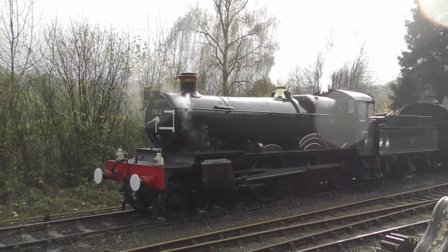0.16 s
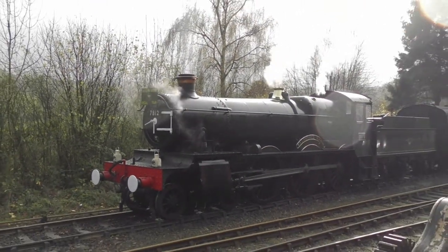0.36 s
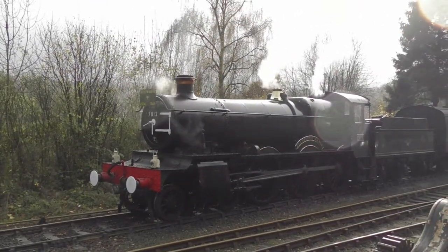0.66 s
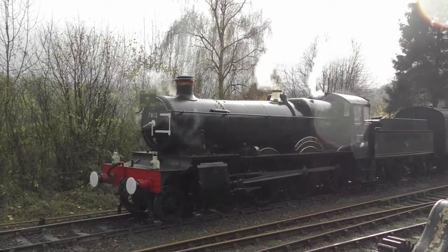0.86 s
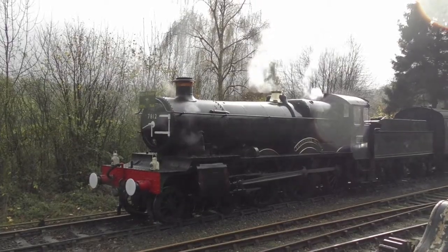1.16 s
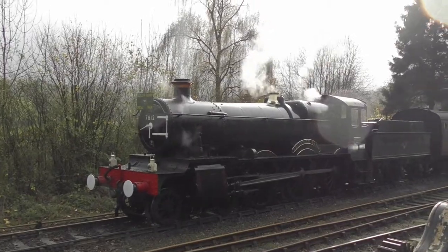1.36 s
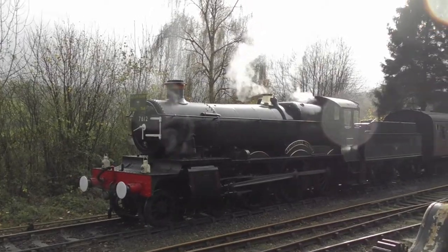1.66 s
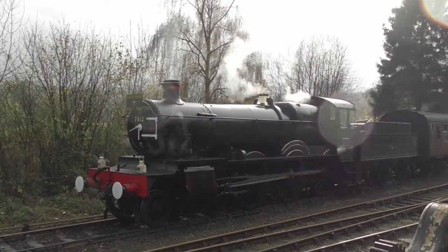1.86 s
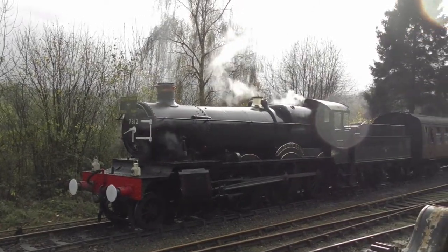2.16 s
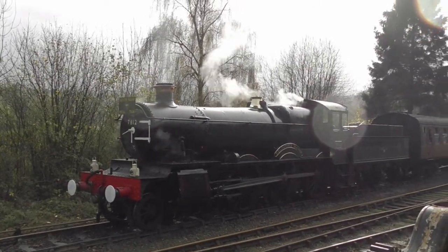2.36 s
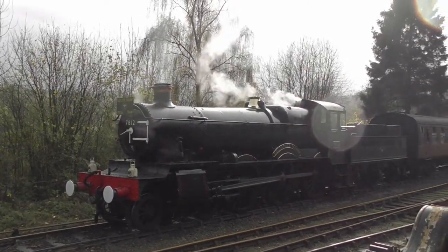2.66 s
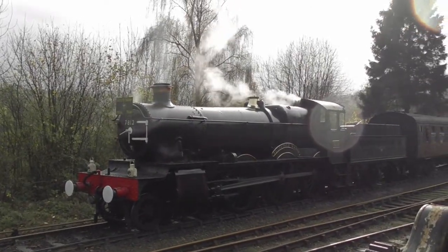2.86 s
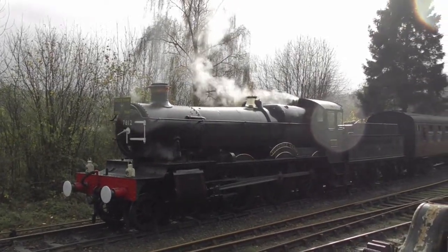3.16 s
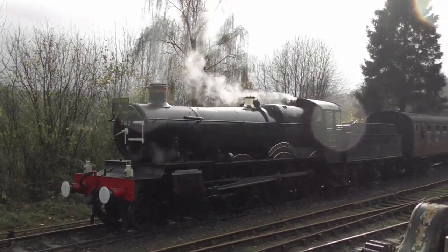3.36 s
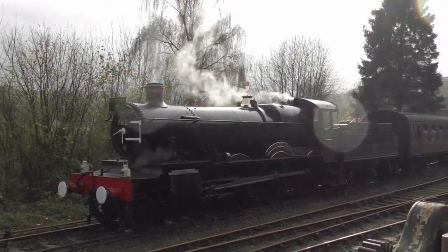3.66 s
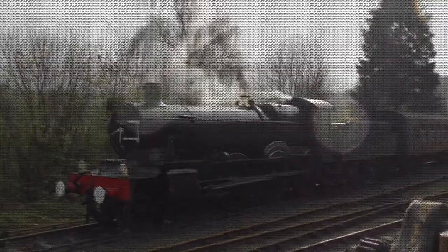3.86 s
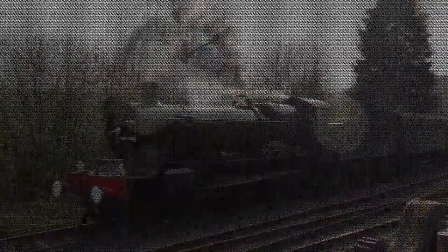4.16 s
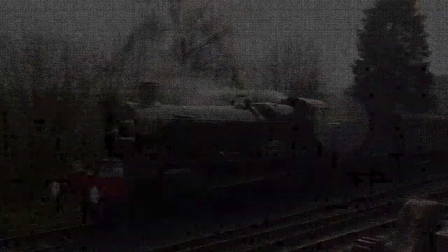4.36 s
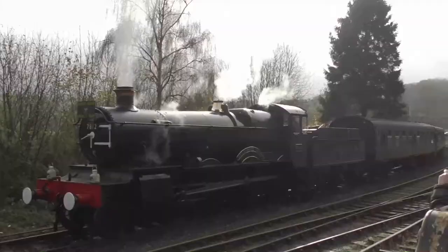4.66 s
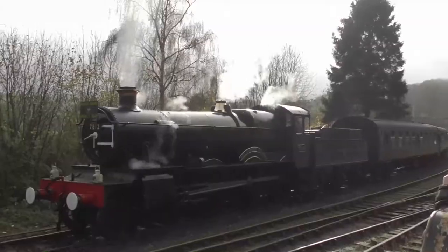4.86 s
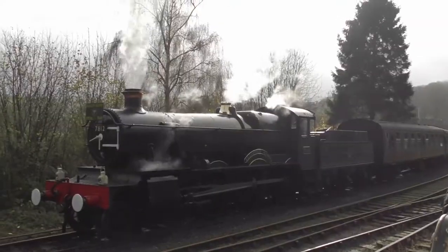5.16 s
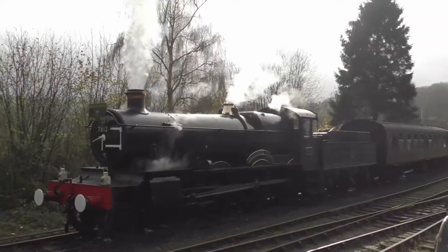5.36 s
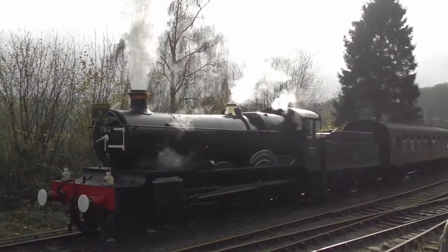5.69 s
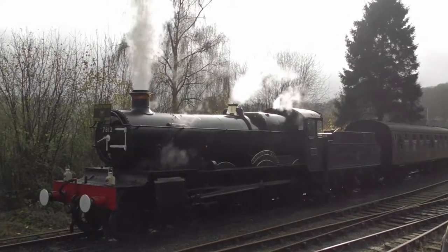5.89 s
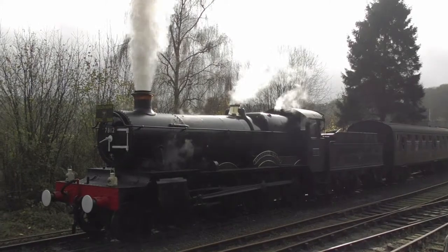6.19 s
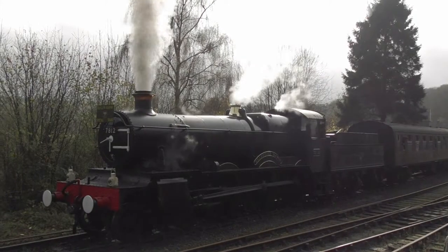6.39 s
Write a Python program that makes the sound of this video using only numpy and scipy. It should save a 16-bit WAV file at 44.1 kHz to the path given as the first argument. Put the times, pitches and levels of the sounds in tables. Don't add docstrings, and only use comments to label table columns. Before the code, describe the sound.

From 0 s a standing steam locomotive blows off outdoors: a loud, continuous, broadband hiss with a hollow roar from its pipes, strongest in the middle and upper range, slightly fluttering and wide in stereo. Between about 1.5 and 2 s its tone shifts subtly. Low wind flutter on the microphone is faint at first, with more thumps from about 2.4 s and stronger ones near 3.8 and 4.1 s. From 3.8 s everything fades steadily, nearly silent by 4.7 s. At 4.76 s the roar abruptly returns with altered resonances and slightly duller treble. A push of air and a short wet puff with a fuzzy rising whistle come at 4.8 s, the hiss ducking momentarily. A low hollow knock follows at 5.1 s. The heaviest wind gust hits around 5.75 s, briefly pressing the hiss down again; steam and lighter buffeting continue until 6.5 s.

```python
import sys
import numpy as np
from scipy import signal
from scipy.fft import rfft, irfft
from scipy.io import wavfile
from scipy.ndimage import uniform_filter1d

SR = 44100
rng = np.random.default_rng(int(sys.argv[2]) if len(sys.argv) > 2 else 0)


def waveform_to_disk(signal):
    frames = np.transpose(np.atleast_2d(signal))
    scaled = np.clip(frames, -1, 1) * 32767
    samples = np.round(scaled).astype(np.int16)
    wavfile.write(sys.argv[1], SR, samples)


def decibels_to_gain(level_db):
    exponent = np.asarray(level_db, float) / 20
    return 10 ** exponent


N = 287973
CUT_S = 4.7565

# [f/Hz, lead/rad]
PORT_LEAD = [(150, .15), (400, .12), (1000, .2), (1950, .3), (2240, .95), (3010, .6), (3880, 1.2),
             (4740, .9), (5510, 1.7), (6290, 1.55), (7920, 2.6), (9000, 3.1), (10600, 3.4)]


def evened(x):
    return x / np.sqrt(np.mean(np.mean(np.atleast_2d(x), 0) ** 2) + 1e-20)


def read(points, hz):
    f, value = np.transpose(points)
    return np.interp(np.log(hz + 1), np.log(f + 1), value)


def drift(low_hz, high_hz, t):
    rates_hz = np.geomspace(low_hz, high_hz, num=30)
    waves = sum(np.sin(2 * np.pi * (f * t + rng.random())) / np.sqrt(f) for f in rates_hz)
    return waves / waves.std()


def stages(t, start, attack, hold, release):
    return np.interp(t, start + np.cumsum([0, attack, hold, release]), [0, 1, 1, 0])


def noise(shared, apart, hz, lead_rad):
    z = rng.standard_normal((3, shared.shape[1], len(hz), 2)) @ [1, 1j]
    common, left, right = z.transpose(0, 2, 1)
    turn = np.exp(.5j * lead_rad)[:, None]
    pair = np.array([shared * common * turn + apart * left,
                     shared * common / turn + apart * right])
    size = 2 * len(hz) - 2
    return signal.istft(pair, nperseg=size, noverlap=3 * size // 4)[1][:, :N]


def jet(patchy_db=1.0, ripple_db=.6, dulling_db_per_octave=-.5, flutter_db=.45):
    # [f/Hz, half width/Hz, first level/dB,
    # level after plume shift/dB, level after cut/dB]
    pipes = [(197, 23, -1.5, -1, 3), (393, 47, -7.5, -6.5, -12), (588, 105, -11, -11.0, -11.5),
             (748.5, 21, 0, -1.5, -5), (835, 79, -3, -3.0, -1), (1034, 47, -13, -12.5, -8),
             (1205, 20.7, -0.5, -1, -6), (1298, 35, 2, 4.5, 5.5), (1428, 74, -0.5, -1, -1),
             (1704, 66, -3.5, -6.5, -10.5), (1804, 42, -9.0, -17, 0), (1873, 146, -3, -2.5, -7),
              (2245, 82, -1.5, -11, -4.5), (2380, 110, -11, -12.5, -12), (2676, 30, -11.5, -17, -6.5),
              (2770, 130, -9, -10, -10), (3130, 68, -9, -2.5, -3.5),
             (3566, 173, -4.5, -6, -51), (3630, 88, -51, -50, -5), (3995, 75, -6.5, -7, -3),
              (4320, 180, -5, -51, -11), (4465, 210, -53, -9.0, -12), (4850, 70, -2, -10, -7),
              (5220, 115, -16, -5, -9.5), (5720, 120, -8.5, -4, -8), (6100, 99, -15.5, -50, -11),
              (6130, 260, -9.5, -10, -22), (6780, 370, -18.5, -17, -14.5), (7700, 260, -22, -14, -47),
              (7780, 110, -49, -48, -13), (8250, 130, -15, -16, -21)]
    # [f/Hz, density/dB per Hz]
    open_jet = [(150, -36), (300, -13), (1000, -40), (2000, -28), (3500, -20.5), (5000, -12.5), (6500, -26),
                (8000, -20), (9200, -21), (10600, -21.5)]
    # [f/Hz, density/dB per Hz]
    scattered = [(130, -32), (220, -21), (400, -24), (800, -21), (1500, -26), (2200, -20), (3500, -19),
                 (5000, -17.5), (6500, -20), (8000, -22), (9200, -23), (10600, -24)]
    # [t/s, hiss level/dB]
    blow = [(0, -20), (1.0, -20), (1.5, -20.5), (2.2, -19.3), (3.2, -20.5), (3.7, -19.7), (4.9, -19.7),
            (5.3, -20), (5.6, -20), (6.0, -21.5), (6.53, -19.5)]
    # [start/s, end/s]
    shift_s = (1.5, 2.05)
    size, hop = 2048, 512
    hz = np.fft.rfftfreq(size, 1 / SR)
    t = np.arange(N // hop + 5) * hop / SR
    now = np.arange(N) / SR

    centre_hz, half_hz, *levels_db = np.transpose(pipes)
    peaks = 1 / (1 + ((hz[:, None] - centre_hz) / (.88 * half_hz)) ** 2) ** 2
    first, shifted, later = (peaks @ decibels_to_gain(2 * level_db) for level_db in levels_db)
    share = np.interp(t, shift_s, [0, 1])
    before_cut = np.outer(first, 1 - share) + np.outer(shifted, share)
    piped = np.where(t < CUT_S - .015, before_cut, later[:, None])
    audible = (hz > 110)[:, None]
    piped += decibels_to_gain(2 * read(open_jet, hz))[:, None] * audible
    apart = decibels_to_gain(2 * read(scattered, hz))[:, None] * audible + piped / 80

    ripple = uniform_filter1d(rng.standard_normal(len(hz)), size=2) * np.clip(hz / 3000, 0, 1)
    patches = uniform_filter1d(rng.standard_normal((len(t), len(hz))), size=8, axis=0)
    patches = uniform_filter1d(patches, size=16, axis=1).T
    dulling = np.outer(np.log2(hz / 2000 + .5), dulling_db_per_octave * (t > CUT_S))
    field_db = patchy_db * patches / patches.std() + dulling
    shared = np.sqrt(piped) * decibels_to_gain(field_db + ripple_db * ripple[:, None] / ripple.std())
    pair = noise(shared, np.sqrt(apart) * decibels_to_gain(field_db), hz, read(PORT_LEAD, hz))
    flutter = np.interp(now, t, drift(3, 30, t))
    return evened(pair) * decibels_to_gain(np.interp(now, *np.transpose(blow)) + flutter_db * flutter)


def puff(apart_db=-8):
    # [start/s, level/dB, attack/s, hold/s, release/s]
    burst_shape = (4.798, -13, .02, .026, .036)
    # [f/Hz, density/dB per Hz]
    burst_colour = [(200, -40), (300, -14), (420, -27), (940, -15.5), (1300, -19), (1700, -15),
                    (2300, -22.5), (2800, -17), (5000, -14.5), (10400, -28.5)]
    # [from f/Hz, to f/Hz, level beside the burst/dB]
    whistle_slide = (1760, 2080, -6.5)
    hz, now = np.fft.rfftfreq(512, 1 / SR), np.arange(N) / SR
    colour = np.outer(decibels_to_gain(read(burst_colour, hz)), np.ones(N // 128 + 5))
    burst = noise(colour, decibels_to_gain(apart_db) * colour, hz, read(PORT_LEAD, hz))
    start_s, level_db, *lengths_s = burst_shape
    from_hz, to_hz, whistle_db = whistle_slide
    pitch_hz = np.interp(now, [start_s, start_s + sum(lengths_s)], [from_hz, to_hz])
    wobble = 1 + .25 * uniform_filter1d(rng.standard_normal(N), size=150)
    whistle = np.sqrt(2) * np.sin(2 * np.pi * np.cumsum(pitch_hz * wobble) / SR)
    envelope = decibels_to_gain(level_db) * stages(now, start_s, *lengths_s) ** 2
    return (evened(burst) + decibels_to_gain(whistle_db) * whistle) * envelope


def knock(start_s, peak_db, f_hz, t60_s):
    t = np.clip(np.arange(N) / SR - start_s, 0, 1)
    return decibels_to_gain(peak_db - 60 * t / t60_s) * np.sin(2 * np.pi * f_hz * t) * (1 - np.exp(-t / .012))


def knocks():
    # [t/s, peak level/dB, f/Hz, t60/s]
    rings = [
        (4.77, -6, 24, .14),
        (5.103, -12, 290, .12),
        (5.1, -19, 400, .08),
        (5.097, -17, 190, .1),
    ]
    return sum(knock(*ring) for ring in rings)


def wind(apart_db=-3, lumpy_db=2.0):
    # [f/Hz, density/dB per Hz]
    wind_colour = [(8, -27), (15, -10.5), (27, 9.5), (40, -10.5), (65, -14), (95, -20), (130, -26.5),
                   (250, -40)]
    # [t/s, level/dB]
    breeze = [(0, -50), (1.3, -51), (2.3, -44), (4.0, -40), (4.7, -37), (5.3, -37), (5.8, -31), (6.53, -37)]
    # [peak t/s, peak level/dB, half length/s]
    gusts = [(.5, -44, .2), (.78, -43, .03), (.96, -42, .03), (1.55, -45, .15), (1.85, -41, .08),
             (2.22, -41, .06), (2.46, -33, .05), (2.7, -36, .05), (2.97, -35, .12), (3.42, -38, .03),
             (3.55, -34, .03), (3.67, -29, .05), (3.84, -25, .03), (4.12, -24, .03), (4.25, -35, .05),
             (4.785, -24, .03), (4.98, -29, .08), (5.4, -33, .04), (5.61, -24, .03), (5.78, -15, .055),
             (5.98, -30, .04), (6.09, -28, .04), (6.25, -28, .05), (6.46, -27, .05)]
    hz, now = np.fft.rfftfreq(4096, 1 / SR), np.arange(N) / SR
    colour = np.outer(decibels_to_gain(read(wind_colour, hz) - 90 * (hz > 400)), np.ones(N // 1024 + 5))
    buffet = evened(noise(colour, decibels_to_gain(apart_db) * colour, hz, np.full(len(hz), np.pi)))
    strength = uniform_filter1d((buffet ** 2).mean(0), size=3500)
    buffet = evened(buffet / np.sqrt(strength + .1))
    coarse = now[::256]
    lumps = np.array([np.interp(now, coarse, drift(1.6, 17, coarse)) for _ in range(2)])
    gusting = decibels_to_gain(2 * np.interp(coarse, *np.transpose(breeze)))
    gusting += sum(decibels_to_gain(2 * peak_db) * np.exp(-((coarse - peak_s) / half_s) ** 2)
                   for peak_s, peak_db, half_s in gusts)
    force = np.interp(now, coarse, np.sqrt(gusting)) * decibels_to_gain(lumpy_db * lumps - 1.0)
    return buffet * force * decibels_to_gain(0) * np.where([[True], [False]], decibels_to_gain(1), decibels_to_gain(-1))


def scene():
    return jet() + puff() + knocks() + wind()


def roll_off(x):
    return signal.sosfilt(signal.butter(12, 11410, fs=SR, output="sos"), x)


def record(dry):
    # [start/s, depth/dB, sink/s, hold/s, recover/s]
    ducks = [
        (4.8, -8, .065, .025, .045),
        (5.715, -6.5, .035, .05, .06),
    ]
    # [f/Hz, left minus right/dB]
    port_tilt = [(60, 0), (150, 2), (250, 1), (400, 0), (640, -1), (1000, .3), (2600, -.6), (4200, -1.3),
                 (10000, -2)]
    edge_hz = 10500
    hz, now = np.fft.rfftfreq(N, 1 / SR), np.arange(N) / SR
    control_db = sum(depth_db * stages(now, start_s, *lengths_s)
                     for start_s, depth_db, *lengths_s in ducks)
    fader = np.interp(now, [0, .012, 3.76, 4.75], [.5, 1, 1, 0]) ** 1.01
    cut_in = np.interp(now, [CUT_S - .035, CUT_S, CUT_S + .004], [0, decibels_to_gain(-22), 1])
    floor_db = -32
    fader = np.maximum(fader + cut_in, decibels_to_gain(floor_db))
    tilt_db = np.outer([.5, -.5], read(port_tilt, hz))
    spectrum = rfft(dry * decibels_to_gain(control_db) * fader) * decibels_to_gain(tilt_db - 90 * (hz > edge_hz))
    return roll_off(irfft(spectrum, N))


dry = scene()
out = record(dry)
waveform_to_disk(out)
```